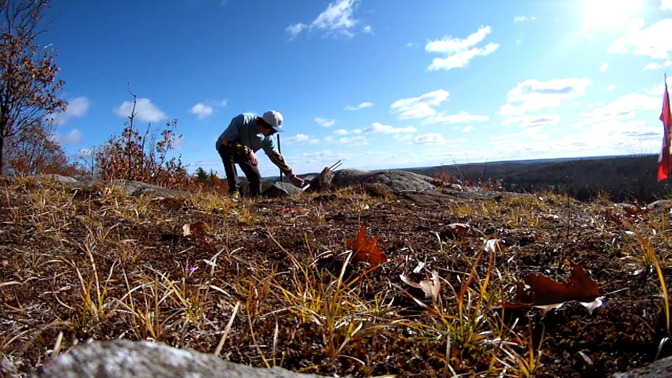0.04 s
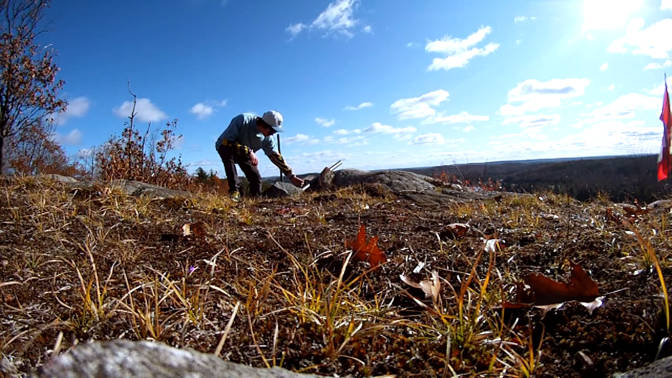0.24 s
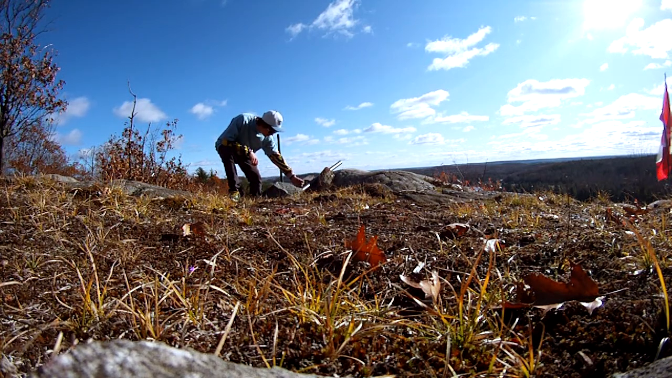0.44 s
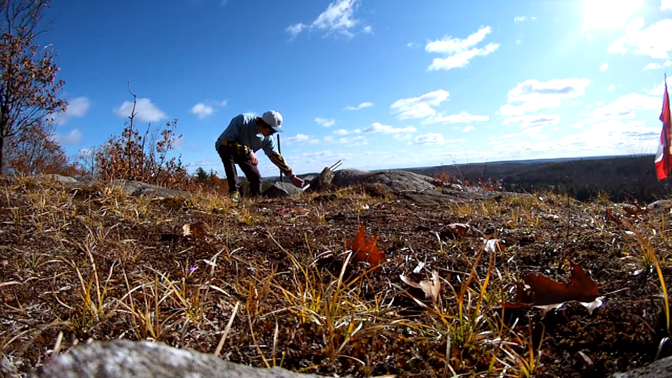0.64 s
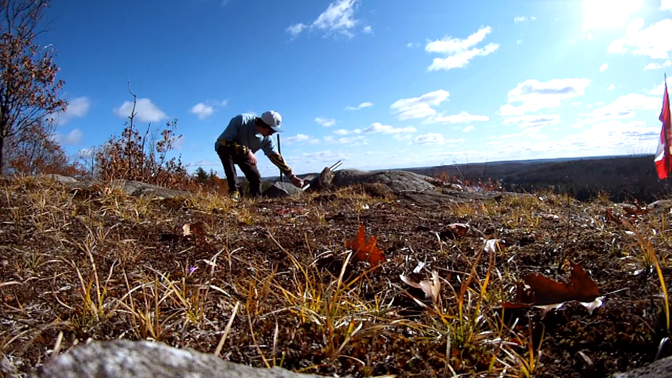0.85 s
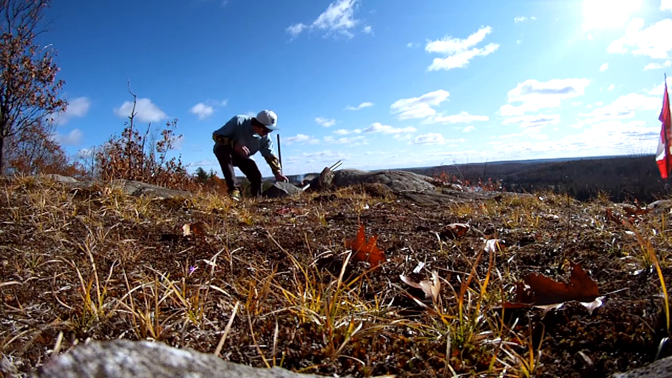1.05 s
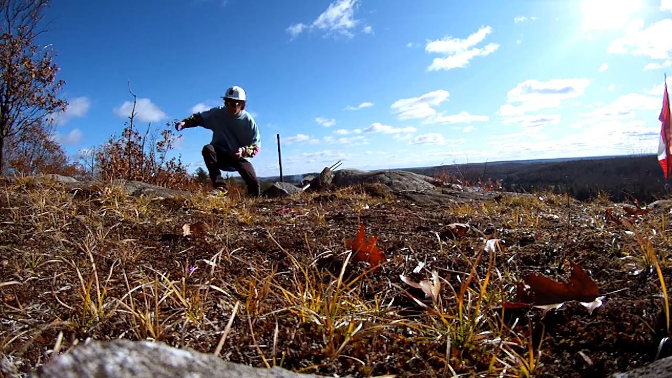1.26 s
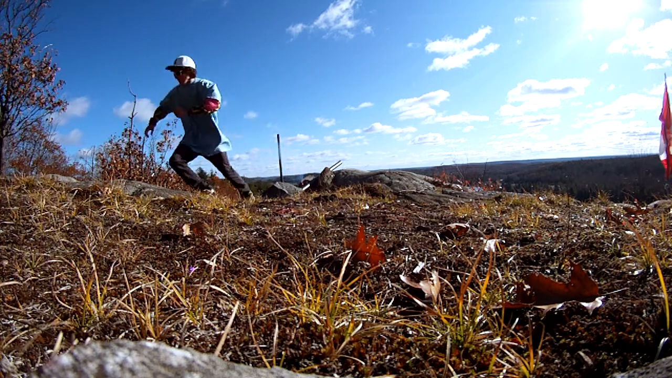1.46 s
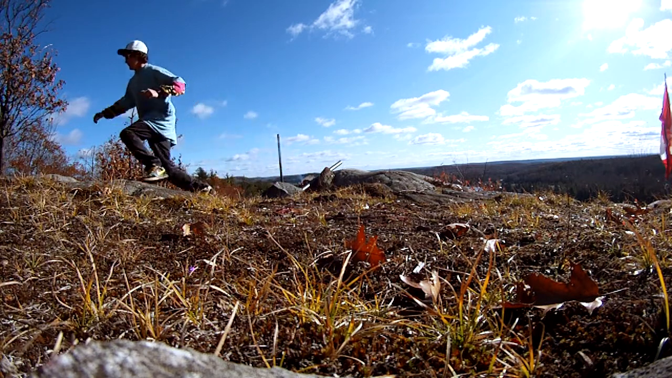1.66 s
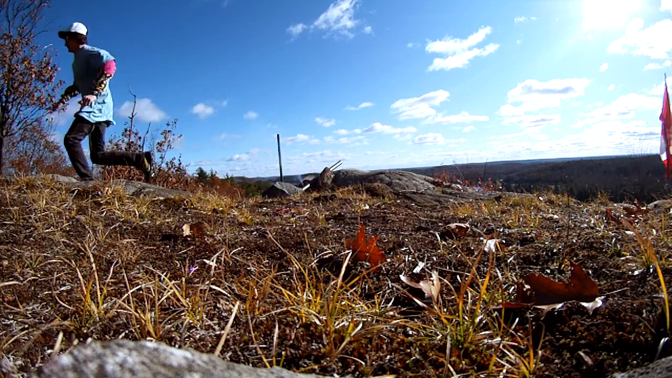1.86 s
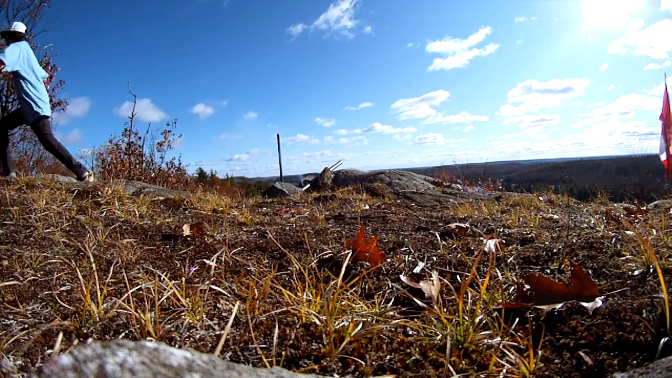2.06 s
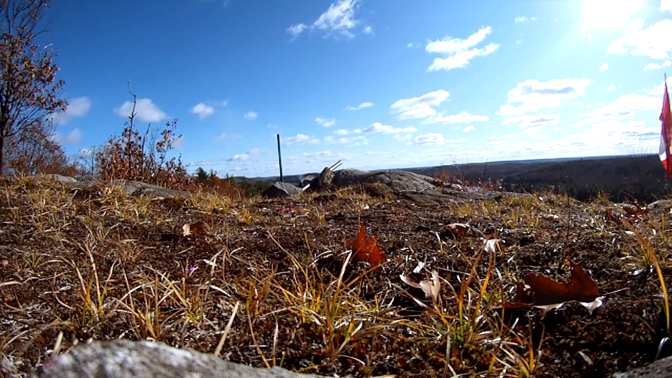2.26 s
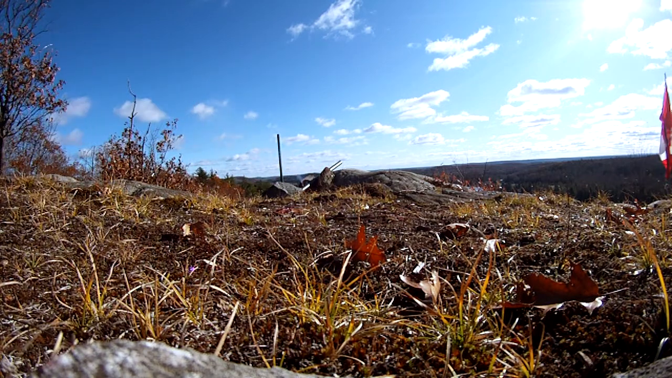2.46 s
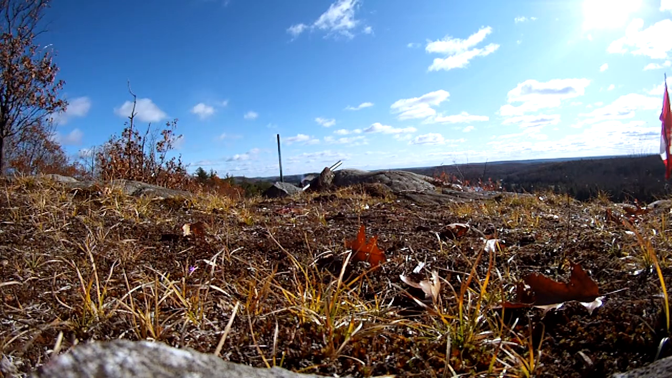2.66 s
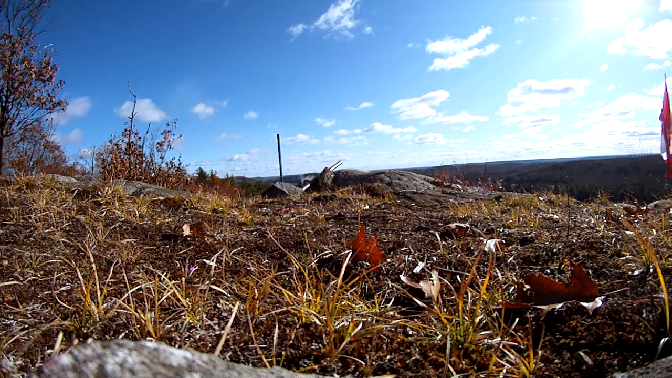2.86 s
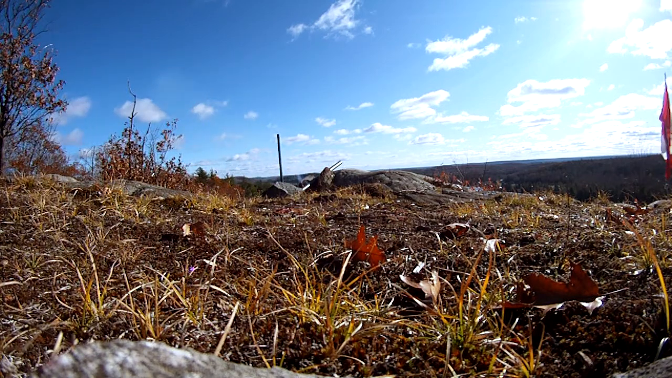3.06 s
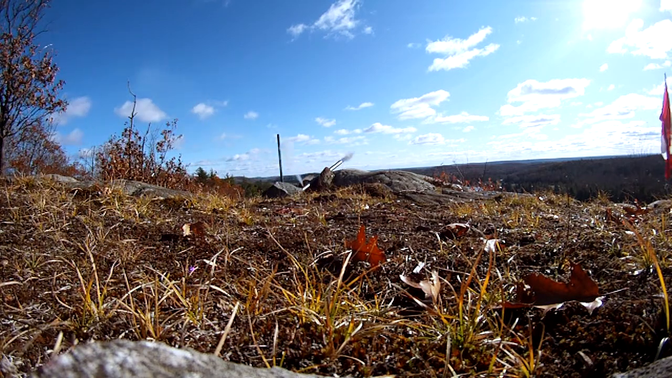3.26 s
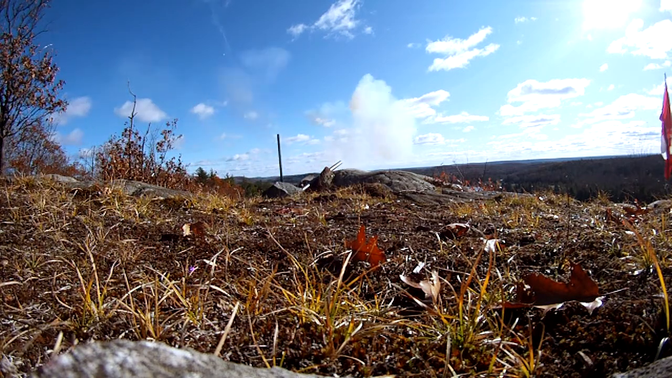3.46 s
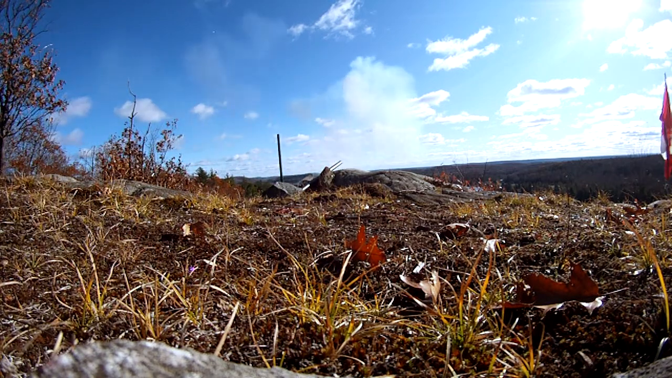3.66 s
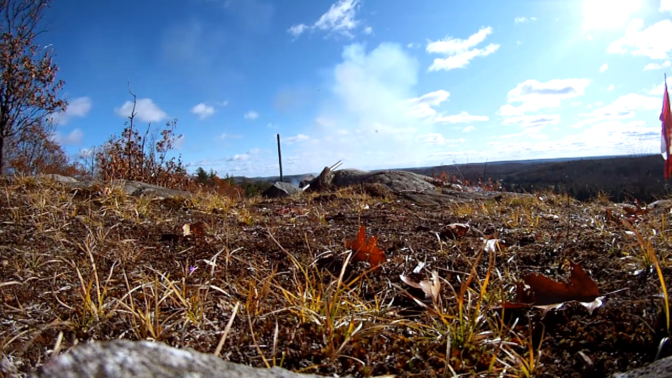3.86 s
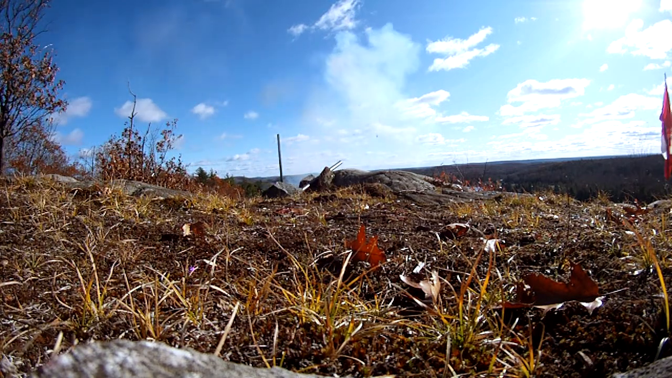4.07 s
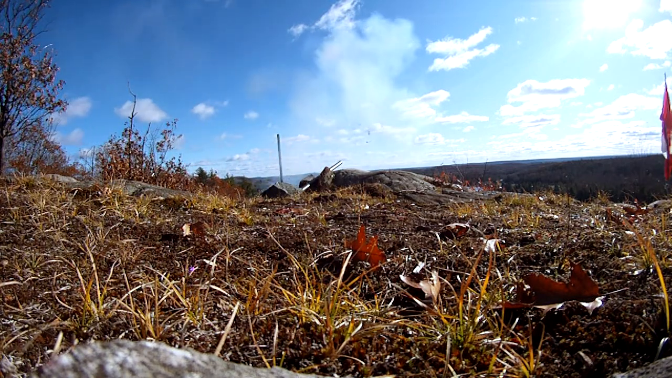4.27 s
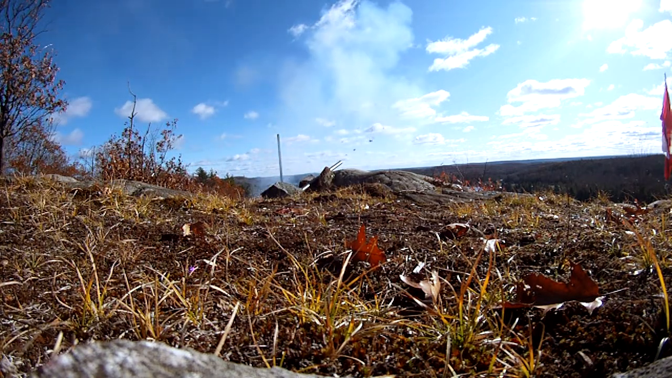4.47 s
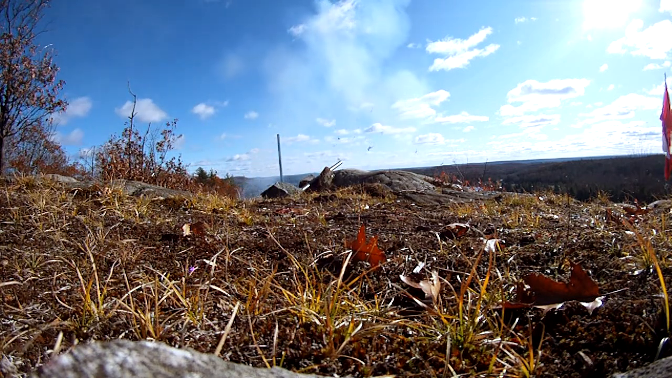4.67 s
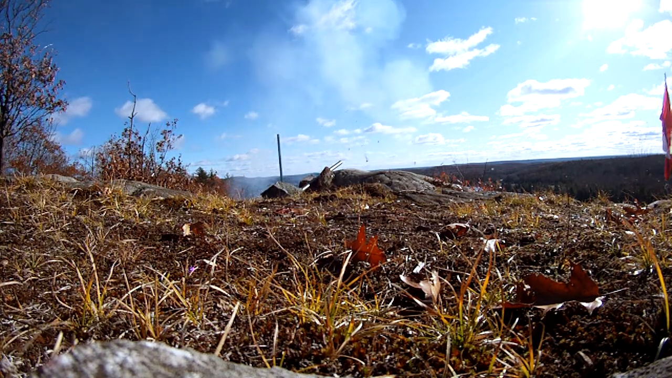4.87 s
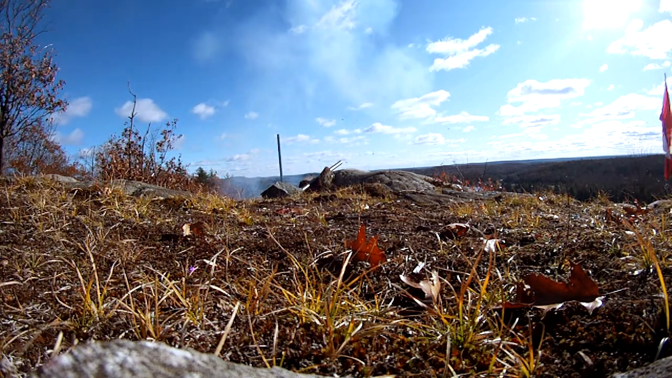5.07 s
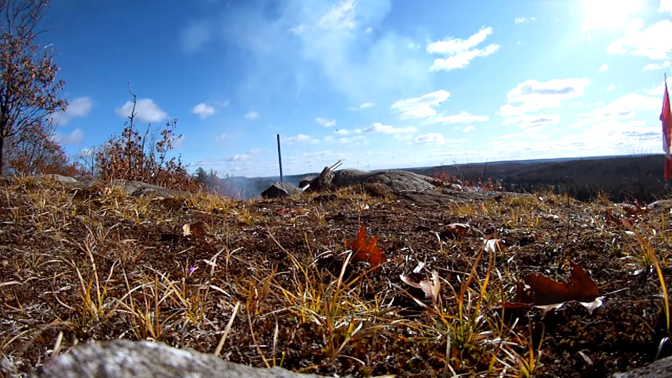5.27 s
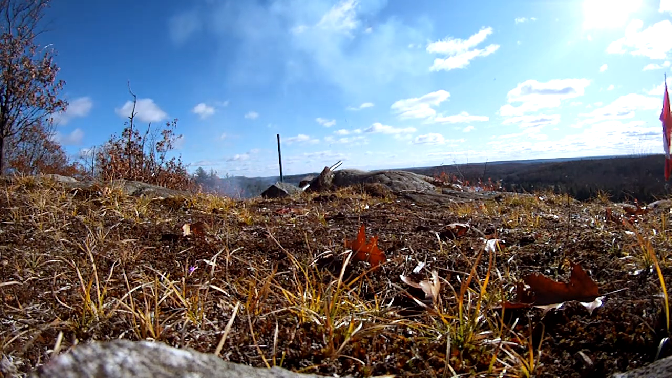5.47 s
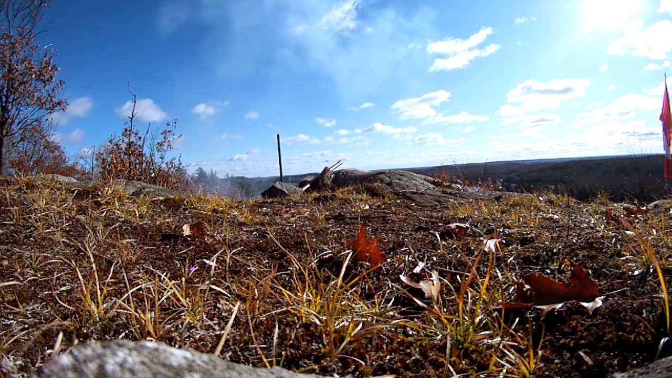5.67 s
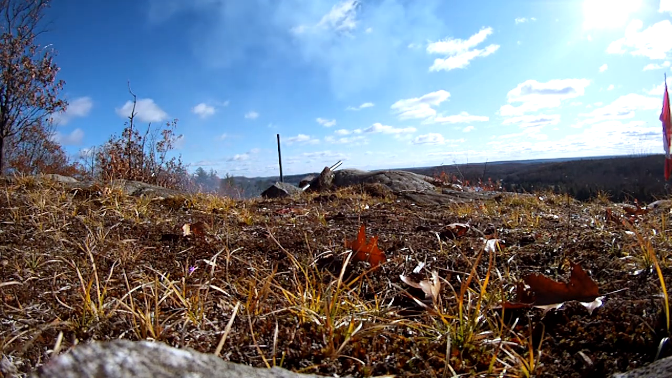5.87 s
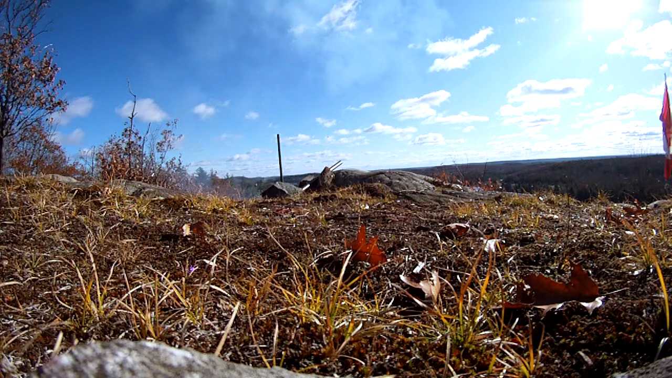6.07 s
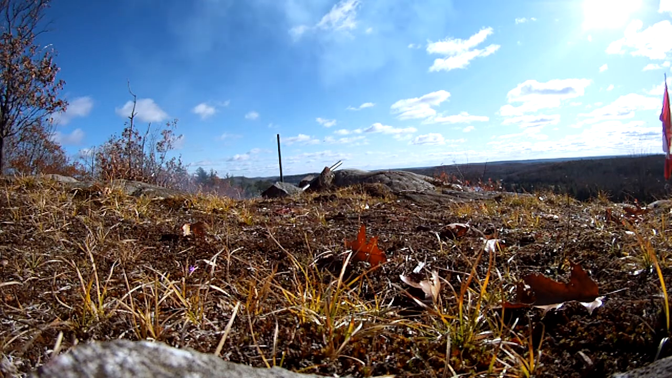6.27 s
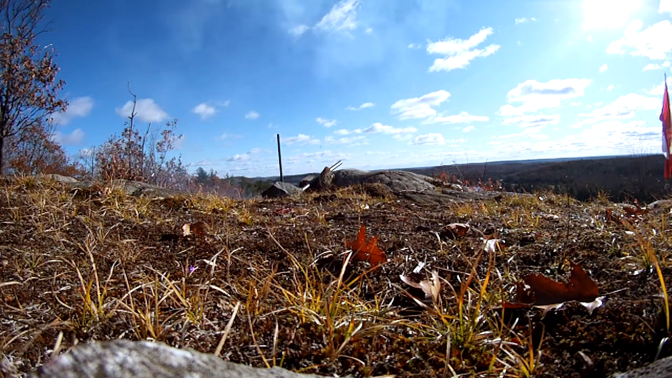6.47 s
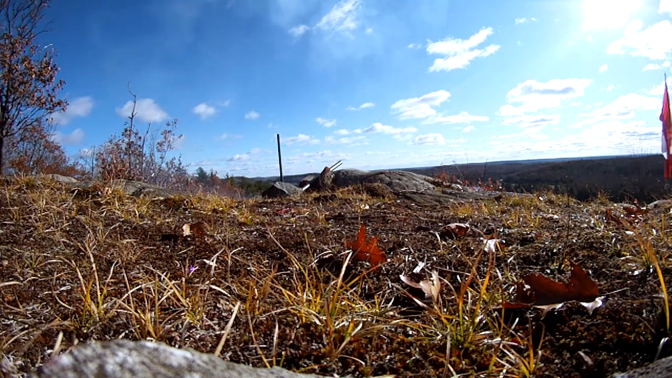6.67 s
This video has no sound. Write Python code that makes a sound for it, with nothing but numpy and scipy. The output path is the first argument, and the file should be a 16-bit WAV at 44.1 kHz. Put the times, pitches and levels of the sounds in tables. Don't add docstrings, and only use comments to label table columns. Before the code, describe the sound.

On an open hilltop, a fuse sizzles, feet thud past, a single clipped boom slaps off rock, and rumbling echoes fade under mic hiss.

```python
import sys
import numpy as np
from scipy import signal
from scipy.fft import rfft, irfft, next_fast_len
from scipy.io import wavfile
from scipy.ndimage import uniform_filter1d

SR = 44100
rng = np.random.default_rng(int(sys.argv[2]) if len(sys.argv) > 2 else 0)


def ratio(d):
    e = np.asarray(d, float) / 20
    return 10 ** e


def inscribe(sig):
    pcm = np.round(np.clip(np.atleast_2d(sig).T, -1, 1) * 32767)
    wavfile.write(sys.argv[1], SR, pcm.astype(np.int16))


N = 296433
T = np.arange(N) / SR

MUZZLE_S, SHUT_S, SLAP_S = 3.271, 3.312, 3.328
# centre in Hz, level in dB, time to fall 60 dB in seconds.
SLAP_TAIL = [(45, -38.5, 0.67), (92, -25.5, 0.57), (164, -8, .65), (302, -8.5, .7), (560, -9.5, .7),
             (1210, -14.5, 0.58), (2600, -14, .6), (4763, -15.5, 0.56), (8000, -23, 0.6), (12500, -32, .5)]

# arrival in seconds, level in dB, fading in dB per second.
SLOPES = [(3.59, -25, 400), (3.655, -33, 80), (3.79, -36, 90), (3.9, -35, 30), (4.02, -35, 12),
          (4.25, -38, 25), (4.4, -38, 90), (4.58, -42, 30), (4.8, -44, 25), (4.925, -39, 100),
          (5.03, -43, 50), (5.32, -52, 40), (5.45, -47, 220), (5.65, -48, 70), (5.78, -49, 110),
          (5.97, -58, 10), (6.22, -43, 50), (6.42, -50, 10), (6.51, -46, 30), (6.72, -45, 30)]
SLOPE_ARRIVE_DB_S = 110
# frequency in Hz, level in dB per Hz.
RUMBLE_COLOUR = [(24, -65), (40, -42.5), (86, -27), (108, -10), (157, 0.5), (289, -2.5), (513, -14.5),
                 (558, -9), (700, -21), (910, -52), (1540, -120)]
# frequency in Hz, level in dB per Hz.
UPPER_COLOUR = [(210, -38), (350, -8), (410, 1), (477, -4.5), (624, -6), (705, -14), (867, -11),
                (1500, -25), (1950, -47), (3300, -120)]
UPPER_DB, DULLING_DB_S = -3.5, 3.5
# start in seconds, peak level in dB, pitch in Hz.
KNOCKS = [
    (3.794, -28, 260),
    (3.993, -26, 250),
    (4.785, -29, 250),
    (5.61, -39, 260),
    (5.65, -39, 230),
    (6.197, -32, 500),
]

# frequency in Hz, level in dB per Hz.
JET_COLOUR = [(240, -23), (400, -2), (438, -4), (602, -3.5), (791, -7), (1450, -1.5), (3010, -10.5),
              (7130, -3), (13700, -10), (14300, -17.5), (15000, -44.5)]
# frequency in Hz, level in dB per Hz.
STUB_COLOUR = [(650, -32), (1100, -1.5), (2190, -5), (2670, -13), (5730, -9.5), (7290, -5.5), (9900, -9),
               (14200, -18), (15000, -35.5)]
# start, top and end in seconds, level in dB, centre in Hz, width in Hz.
MATCH_SPIT = (.54, .69, .77, -59, 5400, 2200)
# time in seconds, roar change in dB, sizzle change in dB, width in seconds.
SURGES = [
    (.955, 5.5, -2, .09),
    (2.77, -1.5, 1.5, .1),
    (3.255, 9, -4, .03),
    (3.17, 0, -3, .15),
    (3.91, 1, -7, .03),
]
LIT_S, OUT_S = .84, 4.71
ROAR_DB, SIZZLE_DB, SIZZLE_CLIMB_DB_S = -52.5, -53, 1.2
ROAR_CATCH_S, SIZZLE_CATCH_S, DIE_S = .07, .13, .035
STUB_ROAR_DB, STUB_SIZZLE_DB, STUB_SAG_DB_S = -48.5, -44.5, 2.5

# start in seconds, peak level in dB, pitch in Hz.
STEPS = [(1.41, -42, 280), (1.6, -42, 250), (1.8513, -24, 240), (1.863, -35, 230), (2.055, -37, 820),
         (2.062, -33, 380), (2.0695, -31, 320), (2.095, -37, 230), (2.102, -40, 230), (2.16, -56, 85),
         (2.41, -52, 80), (2.6861, -15.5, 310), (2.694, -32, 320), (2.707, -36, 270), (2.988, -34, 185),
         (3.0015, -32, 170), (2.997, -27, 440), (3.084, -37, 220)]
THUD_CYCLES, SCUFF_DB, SCUFF_SLOPE = 2.3, -30, .55
# start in seconds, peak level in dB, pitch in Hz.
TICKS = [
    (5.3594, -53, 3764),
    (5.7254, -45.5, 2300),
    (5.7794, -51, 1620),
    (6.1994, -51, 3103),
    (6.2094, -51.5, 1600),
    (6.3363, -44.5, 2700),
]

# peak time in seconds, level in dB.
GUSTS = [
    (.95, -56),
    (2.03, -56),
    (2.38, -54),
    (2.55, -50),
    (3.0, -57),
]
CALM_DB, BREEZE_DB, GUST_FADE_DB_S = -64, -56, 45
# frequency in Hz, level in dB per Hz.
HISS_COLOUR = [(35, -45.5), (60, -19), (219, -10.5), (744, -3), (855, 0), (1080, -5), (1150, -4.5),
               (6230, -8.5), (13700, -12.5), (15000, -30)]
HISS_DB = -60.5


def blast():
    t = np.clip(T - MUZZLE_S, 0, None)
    live = (T > MUZZLE_S) & (T < SHUT_S)
    hz = np.interp(t, [0, .004, .01, .02, .028, .04], [750, 420, 560, 520, 260, 170])
    push = ratio(np.interp(t, [0, .003, .009, .011, .023, .028, .033], [-24, -6, -6, 11, 9, 2, 14]))
    note = push * wobble(hz, 4.0, 900, SHUT_S)
    fizz = ratio(np.interp(t, [0, .003, .006, .01, .03, .033, .04], [-45, -26, -5, 2, 0, -8, -18]))
    crack = fizz * coloured(rng.standard_normal(N), [(100, -3.5), (900, 0.5), (5000, -7), (16400, -18.5)])
    after = np.clip(T - SHUT_S, 0, None)
    ring = 2.6 * np.exp(-after / .0035) * np.sin(2 * np.pi * 150 * after + 0.47) * (T >= SHUT_S)
    ahead_db = np.interp(T - MUZZLE_S, [-0.032, -.008, -.004, 0.039], [-48.5, -34, -26, -26.5],
                         left=-120, right=-120)
    ahead = ratio(ahead_db) * unit(band(rng.standard_normal(N), 330, 400))
    return live * (note + crack) + ring + ahead


def slap():
    t = T - SLAP_S
    rise = ratio(np.interp(t, [-.005, 0, .0012], [-34, -24, 0], left=-120))
    heave = ratio(np.interp(t, [0, .012, .02, .046, .055, .072, .11], [10, 7, 0, -3, -18, -8, -30],
                          left=-120, right=-120))
    spit = ratio(np.interp(t, [0, .002, .015, .048, .054, .1], [6, -3, -4, -7, -16, -32], right=-120))
    out = heave * wobble(np.full(N, 190), 1.8, 300, SLAP_S)
    out += spit * coloured(rng.standard_normal(N), [(400, -3.5), (1500, -0.5), (6000, -4), (16400, -15.5)])
    for hz, db, t60 in SLAP_TAIL:
        noise = unit(band(rng.standard_normal(N), hz, .7 * hz))
        flutter_db = np.clip(1500 / hz, .8, 2.2) * walk(40)
        out += noise * ratio(db - 60 * np.clip(t, 0, None) / t60 + flutter_db)
    return rise * signal.sosfilt(signal.butter(6, 14800, fs=SR, output="sos"), out)


def hills():
    lumps = 1.25 * rng.standard_normal(N) + unit(grains(150, spread_db=13.5))
    low = coloured(lumps, RUMBLE_COLOUR, hi_hz=443)
    upper = coloured(lumps + 2.6 * rng.standard_normal(N), UPPER_COLOUR, lo_hz=444, hi_hz=1300)
    upper = upper * ratio(UPPER_DB - DULLING_DB_S * (T - SLAP_S))
    rumble = low * ratio(1.4 * walk(28)) + upper * ratio(0.86 * walk(20))
    return rumble * swells(SLOPES, SLOPE_ARRIVE_DB_S) * np.clip((T - 3.55) / 0.11, 0, 1)


def fuse():
    before = T < SLAP_S
    gas = rng.standard_normal(N)
    roar = np.where(T < MUZZLE_S, coloured(gas, JET_COLOUR, hi_hz=2800), coloured(gas, STUB_COLOUR, hi_hz=2800))
    sizzle = np.where(T < MUZZLE_S, coloured(gas, JET_COLOUR, lo_hz=2800),
                      coloured(gas, STUB_COLOUR, lo_hz=2800))
    sag_db = STUB_SAG_DB_S * (T - SLAP_S)
    roar_db = np.where(before, ROAR_DB, STUB_ROAR_DB - sag_db)
    climb_db = SIZZLE_CLIMB_DB_S * (T - LIT_S)
    sizzle_db = np.where(before, SIZZLE_DB + climb_db, STUB_SIZZLE_DB - sag_db)
    roar = roar * burn(roar_db, ROAR_CATCH_S, column=1) * ratio(-1.0 + 0.69 * walk(20))
    sizzle = sizzle * burn(sizzle_db, SIZZLE_CATCH_S, column=2) * ratio(-0.95 + 0.67 * walk(12))
    smoke = ~before * .7 * np.exp(-np.abs(T - SLAP_S) / .35)
    sizzle -= band(sizzle, 11800, 3000) * smoke
    drift_ms = .04 * np.cos(2 * np.pi * (T - SLAP_S) / .8 / 2)
    lag_ms = np.where(before, .36, .73 + drift_ms) * ratio(.25 * walk(9))
    delayed = np.interp(np.arange(N) - lag_ms * SR / 1000, np.arange(N), sizzle)
    echo = np.where(before, .13, .3) * delayed
    return roar + sizzle - echo + match_spit()


def match_spit():
    start, top, end, db, hz, width = MATCH_SPIT
    return unit(band(rng.standard_normal(N), hz, width)) * np.interp(T, [start, top, end], [0, ratio(db), 0])


def burn(steady_db, catch_s, column):
    catch_db = 20 * np.minimum((T - LIT_S) / catch_s - 1, 0)
    die_db = 20 * np.maximum(T - OUT_S, 0) / DIE_S
    surge_db = sum(row[column] * np.exp(-((T - row[0]) / row[-1]) ** 2) for row in SURGES)
    return ratio(steady_db + catch_db - die_db + surge_db)


def thuds():
    out = np.zeros(N)
    t = np.arange(SR // 20) / SR
    grit = coloured(rng.standard_normal(N), [(150, -11.5), (400, 3.5), (900, -9), (1400, -27), (4000, -29)])
    for s, db, hz in STEPS + KNOCKS:
        swell = np.sin(np.pi * np.clip(t * hz / THUD_CYCLES, 0, 1) ** .62)
        thud = swell * np.sin(2 * np.pi * (hz * t + .36 * (1 - np.exp(-t * hz / .2))))
        out[int(s * SR):][:len(t)] += ratio(db) * thud
        first = int((s - .02) * SR)
        near = slice(first, first + len(t))
        scuff = grit[near] * np.exp(-((t - .028) / 0.006) ** 2)
        out[near] += ratio(SCUFF_SLOPE * db + SCUFF_DB) * scuff
    return signal.sosfilt(signal.butter(2, 75, "high", fs=SR, output="sos"), out)


def ticks():
    out = np.zeros(N)
    noise = rng.standard_normal(N)
    edge = unit(band(noise, 5100, 3700))
    for s, db, hz in TICKS:
        rustle = unit(band(noise, hz, 0.42 * hz)) + 0.55 * edge
        out += ratio(db - 8) * rustle * np.exp(-((T - s - .004) / 0.0055) ** 2)
    return out


def ambience():
    lumps = rng.standard_normal(N) + 0.67 * unit(grains(140, spread_db=11.5))
    puffs = coloured(lumps, RUMBLE_COLOUR, lo_hz=105)
    hiss = coloured(rng.standard_normal(N), HISS_COLOUR) * ratio(HISS_DB + .4 * walk(4.9))
    breezy = (T > GUSTS[0][0]) & (T < SLAP_S)
    steady = ratio(np.where(breezy, BREEZE_DB, CALM_DB))
    gusts = swells([(s, db, GUST_FADE_DB_S) for s, db in GUSTS], GUST_FADE_DB_S)
    return puffs * np.hypot(steady, gusts) * ratio(2.0 * walk(18)) + hiss


def unit(x):
    return x / np.sqrt(np.mean(x ** 2))


def coloured(x, table, lo_hz=20, hi_hz=20000):
    hz, db = np.transpose(table)
    size = next_fast_len(N)
    f = np.arange(size // 2 + 1) * SR / size + 1
    edges = 1 / np.sqrt((1 + (lo_hz / f) ** 6) * (1 + (f / hi_hz) ** 6))
    gain = ratio(np.interp(np.log(f), np.log(hz), db, right=-100))
    return unit(irfft(rfft(x, size) * gain * edges, size)[:N])


def band(x, hz, width_hz):
    edges = np.clip([hz - width_hz / 2, hz + width_hz / 2], 10, SR / 2 - 500)
    return signal.sosfilt(signal.butter(2, edges, "band", fs=SR, output="sos"), x)


def walk(rate):
    k = int(SR / rate)
    held = np.repeat(rng.standard_normal(N // k + 1), k)
    return unit(uniform_filter1d(uniform_filter1d(held, k), k)[:N])


def grains(rate, spread_db):
    chance = rng.random((3, N))
    return (chance[0] < rate / SR) * np.sign(chance[1] - .5) * ratio(spread_db * chance[2])


def wobble(hz, spread_db, rate, end_s):
    turns = np.cumsum(hz * ratio(spread_db * walk(rate))) / SR
    return np.sin(2 * np.pi * (turns - turns[int(end_s * SR)]))


def swells(rows, rise_db_s):
    power = 0
    for s, db, fade in rows:
        power = power + ratio(db - np.where(T < s, rise_db_s * (s - T), fade * (T - s))) ** 2
    return np.sqrt(power)


def scene():
    numb = ratio(np.interp(T, [MUZZLE_S - .008, MUZZLE_S - .005, SLAP_S, SLAP_S + .05], [0, -25, -25, 0]))
    shot = blast() + slap() + hills()
    return (shot + numb * (fuse() + ambience()) + thuds() + ticks())[None]


def roll_off(x):
    return signal.sosfilt(signal.butter(12, 16430, fs=SR, output="sos"), x)


def record(dry):
    thin = signal.sosfilt(signal.butter(2, 45, "high", fs=SR, output="sos"), dry)
    flat = np.clip(thin, -.985, .985)
    return roll_off(flat)


dry = scene()
out = record(dry)
inscribe(out)
```